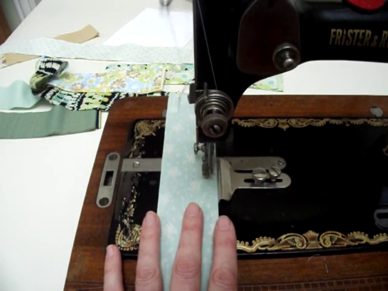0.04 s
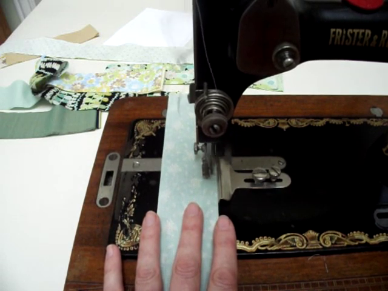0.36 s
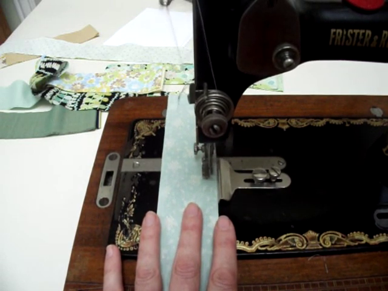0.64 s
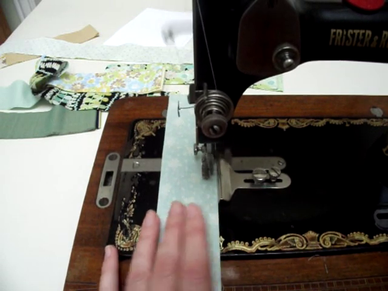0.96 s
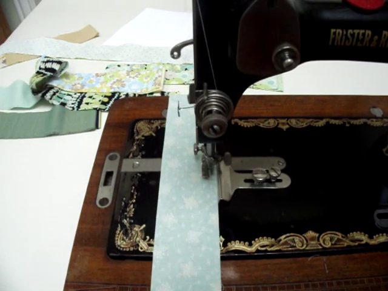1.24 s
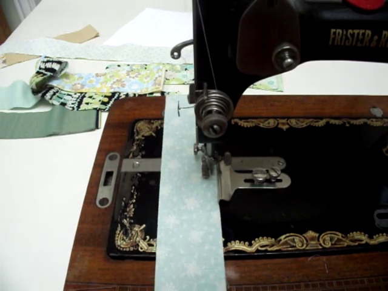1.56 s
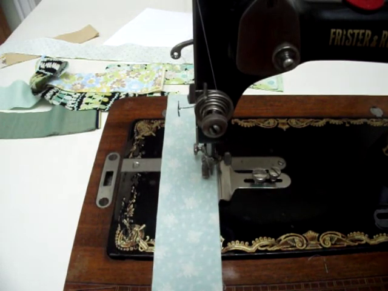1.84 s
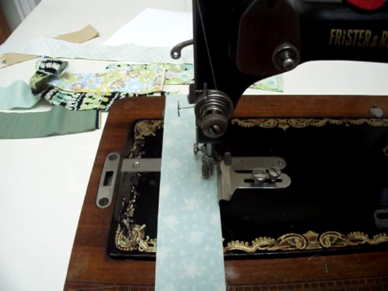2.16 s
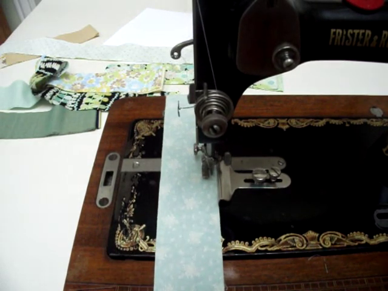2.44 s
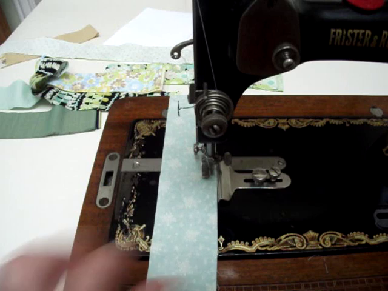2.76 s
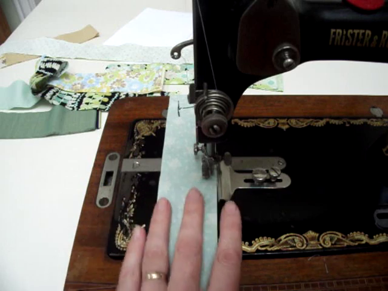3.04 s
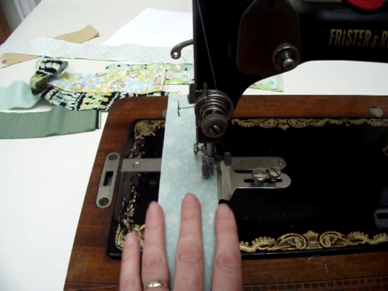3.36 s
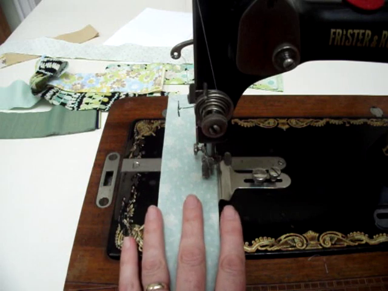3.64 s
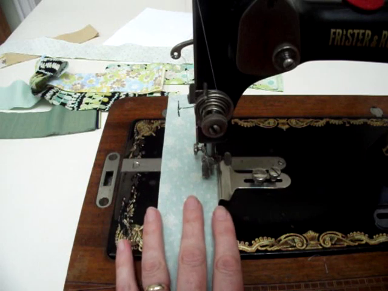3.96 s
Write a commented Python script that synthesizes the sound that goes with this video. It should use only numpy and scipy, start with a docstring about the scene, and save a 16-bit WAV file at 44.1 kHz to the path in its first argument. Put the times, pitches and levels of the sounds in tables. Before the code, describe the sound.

An old sewing machine rattles and whirs through a few stitches, then coasts to a stop with a light clunk. Cloth slides softly, and after a pause one sharp click sounds close by. Muffled, indoors, over steady hiss.

```python
"""An old sewing machine clatters through five stitches and coasts to a stop: loose steel rattles and the
linkage clacks over the whir of the shafts, while the wooden base knocks on a rumbling table. The mechanism
settles with a clunk, cloth slides over the bed, small parts tick, and one sharp click snaps close by.
Steady room hiss lies under it all, and the whole sound is muffled."""
import sys
import numpy as np
from scipy.fft import rfft, irfft, next_fast_len
from scipy.io import wavfile
from scipy.ndimage import map_coordinates

SR = 44100
rng = np.random.default_rng(int(sys.argv[2]) if len(sys.argv) > 2 else 0)


def bounce(signal):
    """Save signal as a 16-bit WAV file at the path given by the first command-line argument."""
    frames = np.transpose(np.atleast_2d(signal))
    limited = np.clip(frames, -1, 1)
    pcm = np.round(limited * 32767).astype(np.int16)
    wavfile.write(sys.argv[1], SR, pcm)


N = 176400

# edges of the five stitches: time_s
STITCH_EDGES = [-0.047, 0.186, 0.365, 0.548, 0.787, 1.08]
# swell of the rattle through one stitch: turn_fraction, gain_db
STITCH_SWELL = [(0, -7), (.06, 1.5), (.3, 3), (.52, -5), (.65, -6), (.93, -9), (1, 1)]
# fader on rattle and whir as the machine runs down: time_s, gain_db
RUN_DOWN = [(0, 1.5), (.14, -1), (.28, -0.5), (.42, 0.5), (.51, 0), (.6, -3), (.73, -3), (.84, -5),
            (.92, -6), (1.0, -10.5), (1.06, -17), (1.2, -28), (1.4, -56)]
# resonances of the loose steel: pitch_hz, width_hz, gain_db
STEEL_MODES = [(2945, 18, -2.5), (3100, 16, 0), (3160, 12, 2), (3203, 12, 3.5), (3441, 70, -3.5),
               (3540, 260, -7), (3703, 30, -7), (4560, 400, -17)]
# tone of the whirring shafts: frequency_hz, gain_db
WHIR_COLOUR = [(60, -19.5), (130, -3), (280, -2.5), (400, -5), (600, -5.5), (780, -4.5), (960, -10.5),
               (1160, -3.5), (1350, -8.5), (1560, -6.5), (2250, -8.5), (2800, -7), (3500, -4.5),
               (4100, -14.5), (4900, -20), (5400, -52.5)]
# resonances of the iron bed and wooden base: pitch_hz, width_hz, boost_db
BED_MODES = [(177, 16, 3), (248, 18, 8), (300, 20, 9.5), (376, 13, 8), (455, 30, 3.5), (651, 19, 7),
             (864, 40, 5)]
# hits of the linkage: start_s, level_db, pitch_hz, rise_s
LINKAGE_HITS = [(0.028, -13.5, 3210, 0.0027), (0.0587, -16, 3250, 0.0016), (0.07, -15.5, 2760, 0.0011),
                (.089, -17, 2870, 0.0015), (.173, -21.5, 3380, 0.0028), (0.1834, -14, 2750, 0.00097),
                (0.215, -12.5, 3190, 0.0031), (0.2448, -16.5, 3190, 0.0021), (0.2757, -18, 2930, 0.00081),
                (.362, -14.5, 3390, 0.0021), (0.371, -18, 2900, 0.0014), (.402, -22, 3260, 0.0029),
                (0.4232, -13.5, 3200, 0.0029), (0.4446, -16.5, 2940, 0.002), (0.464, -19, 2900, 0.0012),
                (0.5064, -23.5, 3400, 0.0018), (.551, -21, 3600, .0016), (0.5617, -17, 2940, 0.002),
                (.609, -17, 3320, 0.0014), (0.6158, -14.5, 3160, 0.0019), (0.6612, -19, 2930, 0.00205),
                (0.776, -22.5, 2920, 0.0023), (0.794, -21.5, 3000, .0015), (0.812, -23, 3220, 0.004),
                (0.819, -20.5, 3190, 0.0035), (0.8341, -13.5, 3180, 0.0035), (0.8856, -20, 3280, 0.0022),
                (0.992, -25.5, 3210, 0.0039)]
# knocks of the base and soft thumps of the table: start_s, level_db, pitch_hz, rise_s
BASE_KNOCKS = [(.2485, -24, 75, 0.0046), (.293, -20, 42, 0.0084), (.336, -23, 46, 0.0074),
               (.3865, -18.5, 260, 0.0033), (.388, -22, 630, 0.0027), (.443, -24, 300, .007)]
# fader on the table's rumble: time_s, level_db
RUMBLE_FADER = [(0, -32.5), (.2, -34.5), (.31, -30.5), (.42, -33), (.6, -32), (.8, -38), (.95, -39.5),
                (1.05, -61), (1.4, -84)]
# tone of that rumble: frequency_hz, gain_db
RUMBLE_COLOUR = [(10, -6), (22, -1.5), (32, -9.5), (44, -3.5), (60, -7), (120, -9), (180, -13.5),
                 (400, -42), (1500, -83)]
# the two hits of the settling mechanism: start_s, level_db
CLUNK_HITS = [(1.2305, -28), (1.2355, -43)]
# modes those hits ring: pitch_hz, gain_db, t60_s
CLUNK_MODES = [(470, -12, 0.14), (510, -1.5, 0.2), (680, -8, 0.056), (850, -2.5, 0.075), (1560, -6.5, 0.06),
               (3050, -2, 0.049), (3690, 5, 0.025), (3760, -6, 0.09), (4300, -10, 0.045)]
# small ticks and bumps: start_s, level_db, centre_hz, width_hz, t60_s
SMALL_TICKS = [(.802, -21, 702, 900, 0.033), (0.834, -21, 5000, 1800, 0.0084),
               (0.9457, -17.5, 1550, 2400, 0.088), (0.974, -33, 2600, 1200, 0.028),
               (0.999, -28, 445, 700, 0.053), (1.123, -28.5, 1150, 600, 0.013),
               (1.318, -32, 95, 120, 0.043)]
# modes of the sharp click: pitch_hz, gain_db, rise_s
SNAP_MODES = [(1334, -0.9, .00142), (2465, 0, .00124), (3400, -15.3, .0015)]
# its dull rebounds: delay_s, level_db, pitch_hz, rise_s
REBOUNDS = [(.0052, -21, 1420, 0.0027), (.009, -24, 1070, 0.0013)]
# fader on the sliding cloth: time_s, level_db
CLOTH_FADER = [(1.22, -51), (1.27, -40), (1.4, -48.5), (1.48, -59), (1.515, -38.5), (1.6, -40.5),
               (1.7, -44.5), (1.82, -72), (1.9, -91)]
# tone of the cloth: frequency_hz, gain_db
CLOTH_COLOUR = [(80, -16), (300, 4), (900, -3), (2000, -3.5), (3300, 3), (4300, -7.5), (5500, -22.5)]
# tone of the room hiss: frequency_hz, gain_db
HISS_COLOUR = [(10, 7.5), (25, 9), (80, 5), (125, 4), (210, -3), (340, -3.5), (500, -6), (1000, -5.5),
               (1400, -2.5), (2500, -1.5), (3100, -4), (3900, -4), (4250, -8.5), (5000, -10.5),
               (5300, -14.5), (5550, -30)]
# resonances in the hiss: pitch_hz, width_hz, boost_db
HISS_MODES = [(1169, 91, 8), (1475, 67, 4.5), (1530, 87, 5.4), (1702, 63, 9.1), (1960, 130, 3.7),
              (2435, 92, 3.6), (2600, 91, 5), (2855, 77, 4), (3490, 180, 3.3)]
# faint whines in the room: pitch_hz, level_db
ROOM_WHINES = [(2375, -54), (2806, -67), (4513, -61.5)]

RATTLES_PER_S, RATTLE_SPREAD_DB, RATTLE_TRIM_DB = 1400, 3.5, -30.3
WHIR_TRIM_DB, WHIR_SWELL_SHARE, WHIR_GRAIN_DB = -25.5, 0.36, 1.5
CLACK_CRACK_DB, CLACK_KNOCK_DB, CLUNK_CRACK_DB = -6, -12, 3  # relative to each hit
CLICK_S, CLICK_TRIM_DB = 3.1031, -3.3
HISS_DB = -38.5
STEEL_TOP_HZ, BAND_TOP_HZ, OUTPUT_TOP_HZ = 4415, 5450, 15400


def machine():
    """Rattle and whir swell in the first half of each stitch and fade as the machine coasts."""
    turn = np.interp(np.arange(N) / SR, STITCH_EDGES, np.arange(len(STITCH_EDGES))) % 1
    swell_db = np.interp(turn, *np.transpose(STITCH_SWELL))
    rattle = amp(RATTLE_TRIM_DB + swell_db) * steel_rattle()
    whir = amp(WHIR_TRIM_DB + WHIR_SWELL_SHARE * swell_db) * shaft_whir()
    return amp(curve(RUN_DOWN)) * (rattle + whir)


def steel_rattle():
    """A dense spray of tiny random contacts rings the loose steel."""
    contacts = (rng.random(N) < RATTLES_PER_S / SR) * rng.choice([-1, 1], N)
    strength = amp(RATTLE_SPREAD_DB * rng.standard_normal(N))
    steel = lambda f: sum((-1) ** k * amp(db) * resonance(f, hz, width)
                          for k, (hz, width, db) in enumerate(STEEL_MODES))
    return mellow(unit(filtered(contacts * strength, steel)))


def shaft_whir():
    """The shafts whir through the resonant bed; a fast level flutter adds grain."""
    return unit(noise(WHIR_COLOUR, BED_MODES) * amp(WHIR_GRAIN_DB * wobble(rate_hz=160)))


def linkage_clacks():
    """Shuttle, needle bar and feed strike their stops: a steel ring, a crack and a knock in the base."""
    out = np.zeros(N)
    for start_s, db, hz, rise_s in LINKAGE_HITS:
        add(out, start_s, amp(db) * blip(hz, rise_s))
        crack = amp(CLACK_CRACK_DB) * burst(hz=3000, width_hz=3000, t60_s=0.036)
        knock = amp(CLACK_KNOCK_DB) * burst(hz=330, width_hz=420, t60_s=0.051)
        add(out, start_s + rise_s / 2, amp(db) * (crack + knock))
    return out


def base_knocks():
    """The running machine rocks its wooden base against the table."""
    out = np.zeros(N)
    for start_s, db, hz, rise_s in BASE_KNOCKS:
        add(out, start_s, amp(db) * blip(hz, rise_s))
    return out


def table_rumble():
    """The table shakes under the running machine and fills out the low end."""
    return amp(curve(RUMBLE_FADER)) * noise(RUMBLE_COLOUR)


def settling_clunk():
    """The stopped mechanism drops back with a double hit: a ringing body under a bright crack."""
    out = np.zeros(N)
    for start_s, db in CLUNK_HITS:
        body = sum(amp(gain_db + rng.normal(0, 1.2)) * ring(hz * (1 + rng.normal(0, 0.0017)), t60_s)
                   for hz, gain_db, t60_s in CLUNK_MODES)
        crack = amp(CLUNK_CRACK_DB) * burst(hz=3700, width_hz=2200, t60_s=0.17)
        add(out, start_s, amp(db) * (body + crack))
    return out


def small_ticks():
    """Small parts tick and bump, ending on one crisp tick of metal."""
    out = np.zeros(N)
    for start_s, db, hz, width_hz, t60_s in SMALL_TICKS:
        add(out, start_s, amp(db) * burst(hz, width_hz, t60_s))
    add(out, start_s=1.5741, sound=amp(-19) * blip(hz=2750, rise_s=0.0006))
    return out


def sharp_click():
    """A dry, hard click close by, with two dull rebounds."""
    out = np.zeros(N)
    snap = sum(amp(db) * blip(hz, rise_s) for hz, db, rise_s in SNAP_MODES)
    add(out, CLICK_S, amp(CLICK_TRIM_DB) * snap)
    for delay_s, db, hz, rise_s in REBOUNDS:
        add(out, CLICK_S + delay_s, amp(db) * blip(hz, rise_s))
    return out


def cloth_slide():
    """The strip of cloth slides over the bed in two soft swishes."""
    return amp(curve(CLOTH_FADER)) * noise(CLOTH_COLOUR)


def room_tone():
    """Steady resonant hiss with a few faint whines, as of a small fan."""
    t = np.arange(N) / SR
    hiss = amp(HISS_DB) * noise(HISS_COLOUR, HISS_MODES)
    whines = sum(amp(db) * np.sin(2 * np.pi * hz * t + wobble(rate_hz=14)) for hz, db in ROOM_WHINES)
    return hiss + whines


def blip(hz, rise_s):
    """A heavily damped mode that peaks at rise_s and dies quickly."""
    t = np.arange(SR // 20) / SR
    return np.sin(2 * np.pi * hz * t) * (t / rise_s * np.exp(1 - t / rise_s)) ** 3


def ring(hz, t60_s):
    """One struck mode."""
    return np.sin(2 * np.pi * hz * np.arange(SR // 4) / SR) * fade(t60_s, attack_s=0.00083)


def burst(hz, width_hz, t60_s):
    """A dying puff of noise around hz, with peak 1."""
    band = filtered(rng.standard_normal(SR // 4), lambda f: resonance(f, hz, width_hz) ** 3)
    puff = band * fade(t60_s, attack_s=0.0002)
    return puff / np.abs(puff).max()


def fade(t60_s, attack_s):
    """A quarter second of attack and exponential decay."""
    t = np.arange(SR // 4) / SR
    return np.exp(-np.log(1000) * t / t60_s) * (1 - np.exp(-t / attack_s))


def noise(colour, modes=()):
    """Noise of rms 1, shaped by an EQ curve and optional resonant boosts."""
    points_hz, points_db = np.transpose(colour)

    def eq(f):
        curve_db = np.interp(np.log(f + 1), np.log(points_hz + 1), points_db)
        boost_db = sum(db * abs(resonance(f, hz, width)) ** 2 for hz, width, db in modes)
        return amp(curve_db + boost_db)
    return unit(filtered(rng.standard_normal(N), eq))


def mellow(x):
    """Roll the top treble off the steel."""
    return lowpass(x, STEEL_TOP_HZ, order=10)


def lowpass(x, top_hz, order):
    return filtered(x, lambda f: 1 / np.sqrt(1 + (f / top_hz) ** (2 * order)))


def resonance(f, hz, width_hz):
    return 1j * f * width_hz / (hz * hz - f * f + 1j * f * width_hz)


def filtered(x, response):
    """Pass x through a frequency response."""
    size = next_fast_len(len(x) + SR // 2)
    return irfft(rfft(x, size) * response(np.fft.rfftfreq(size, 1 / SR)), size)[:len(x)]


def wobble(rate_hz):
    """A smooth random curve with rate_hz knots a second."""
    knots = rng.standard_normal(int(N * rate_hz / SR) + 4)
    return map_coordinates(knots, [np.arange(N) * rate_hz / SR])


def curve(points):
    """Join fader points into one value per sample."""
    return np.interp(np.arange(N) / SR, *np.transpose(points))


def add(track, start_s, sound):
    part = track[max(round(start_s * SR), 0):][:len(sound)]
    part += sound[:len(part)]


def amp(db):
    return 10 ** (np.asarray(db) / 20)


def unit(x):
    return x / np.sqrt(np.mean(x ** 2) + 1e-20)


def scene():
    """The mono mix: machine, hits and click over cloth and room tone."""
    backdrop = room_tone() + cloth_slide()
    hits = mellow(linkage_clacks() + settling_clunk() + small_ticks()) + base_knocks()
    return (machine() + table_rumble() + hits + sharp_click() + backdrop)[None]


def record(dry):
    """The sound is muffled, cut off steeply above about 5.5 kHz, then clipped at full scale."""
    muffled = lowpass(dry[0], BAND_TOP_HZ, order=70)
    return lowpass(np.clip(muffled, -1, 1), OUTPUT_TOP_HZ, order=50)[None]


dry = scene()
out = record(dry)
bounce(out)
```